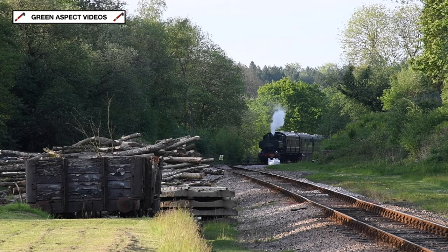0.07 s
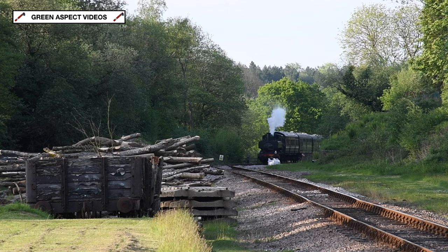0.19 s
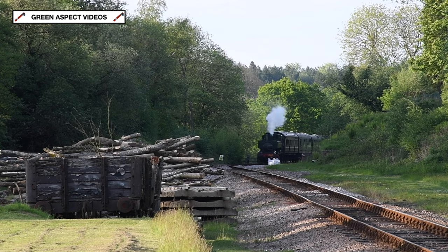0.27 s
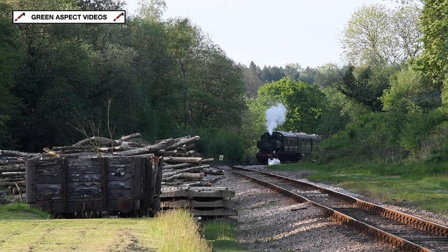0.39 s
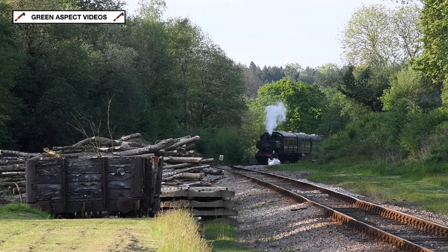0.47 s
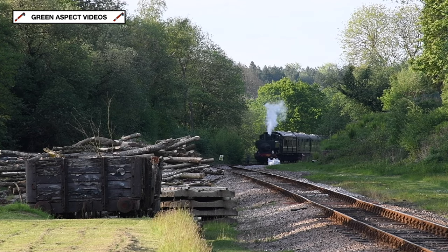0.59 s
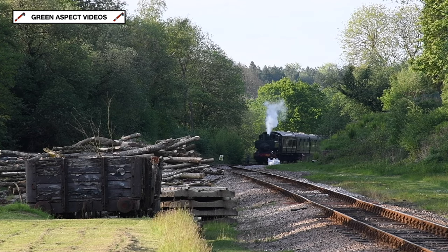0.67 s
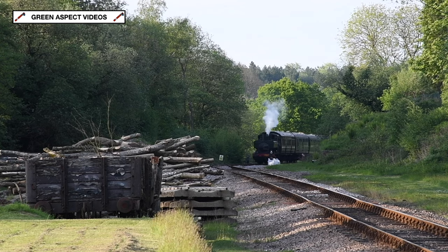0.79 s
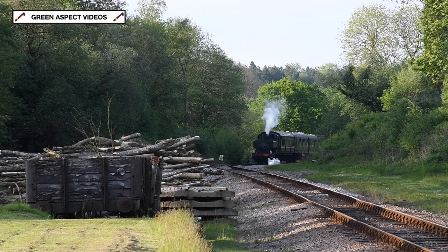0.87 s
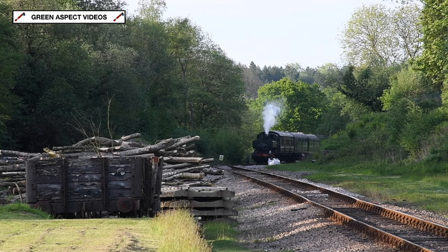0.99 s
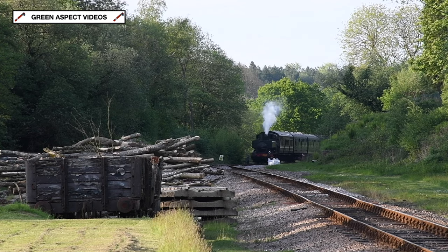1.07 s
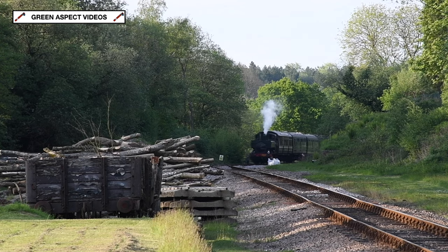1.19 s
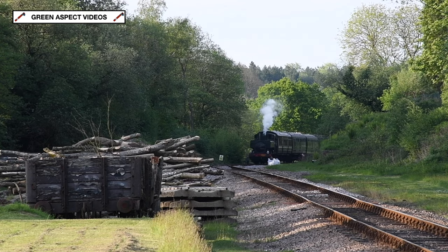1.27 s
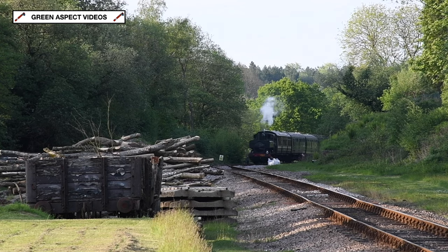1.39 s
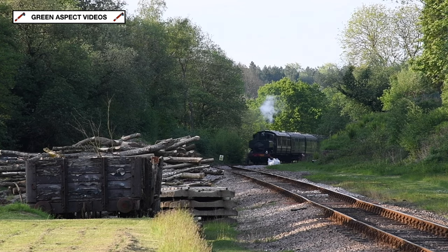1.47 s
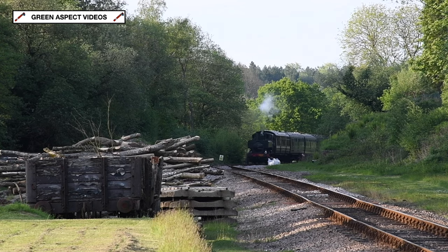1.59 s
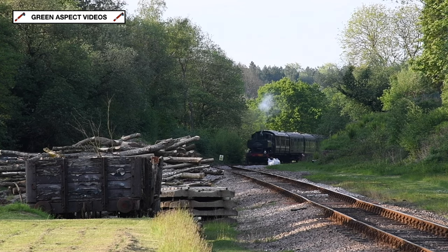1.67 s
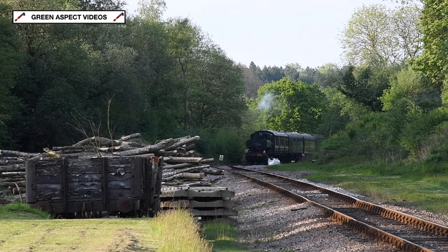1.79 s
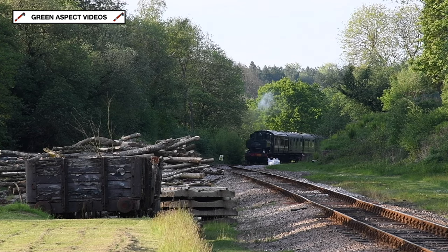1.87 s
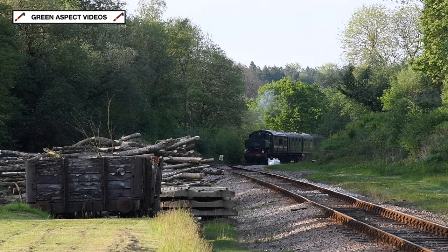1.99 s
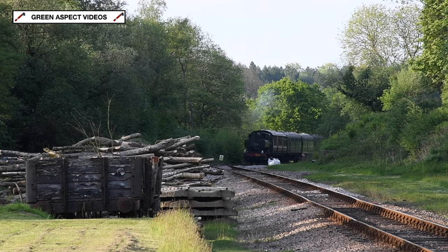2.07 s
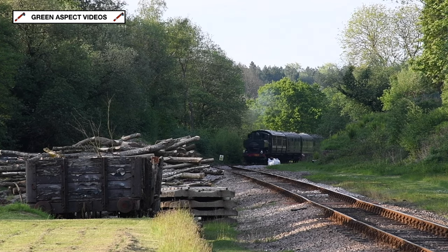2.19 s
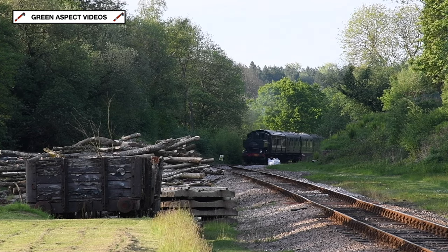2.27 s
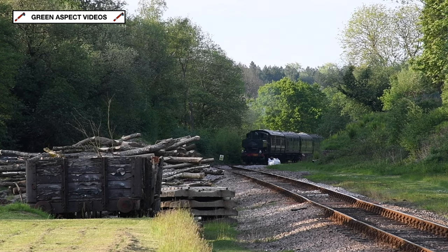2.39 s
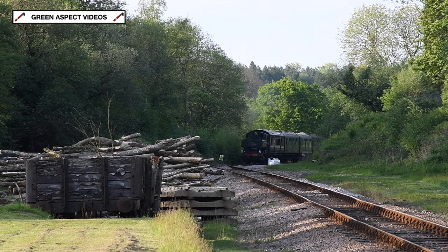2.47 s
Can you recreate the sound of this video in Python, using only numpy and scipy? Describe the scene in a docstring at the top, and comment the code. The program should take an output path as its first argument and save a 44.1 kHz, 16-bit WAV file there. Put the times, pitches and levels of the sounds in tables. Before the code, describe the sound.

Single rough, wavering steam whistle blast far down a wooded railway, then a short echoing tail

```python
"""Distant steam whistle

A steam whistle blows once far down a wooded railway line and its echo hangs in the trees.
The steam jet drives three modes of a stopped bell; they waver and mix into sum and difference tones.
A rough undertone and the jet's roar share the same valve; filtered, decaying noise makes the echo.
Around it: low country rumble as shaped noise, and the even white hiss of the recorder."""
import sys
import numpy as np
from scipy import signal
from scipy.fft import rfft, irfft
from scipy.io import wavfile
from scipy.ndimage import uniform_filter1d

SR = 44100
rng = np.random.default_rng(int(sys.argv[2]) if len(sys.argv) > 2 else 0)


def generate_wav(signal):
    """Clip the signal to [-1, 1] and save it as 16-bit WAV at the path in sys.argv[1]."""
    frames = np.transpose(np.atleast_2d(signal))
    scaled = np.clip(frames, -1, 1) * 32767
    pcm = np.round(scaled).astype(np.int16)
    wavfile.write(sys.argv[1], SR, pcm)


def undo_db(level):
    """Turn decibels back into plain size, where 20 dB means ten times bigger."""
    steps = np.asarray(level, float) / 20
    return 10 ** steps


N = 110250

# spectrum of the country rumble, relative: (frequency [Hz], density [dB per Hz])
COUNTRY_SPECTRUM = [(18, -44), (30, -31.5), (55, -7.5), (80, -2), (140, -7), (200, -16), (300, -12.5),
                    (550, -8), (900, -14.5), (1500, -15.5), (2500, -22), (4500, -41), (8000, -63)]
COUNTRY_DB, HISS_DB = -48.5, -57.5   # rms levels

# echo from the trees: (from [Hz], to [Hz], relative level [dB], time to fall 60 dB [s])
ECHO_BANDS = [(103, 1156, -1, 2), (1310, 2980, -3.5, 1.3), (2872, 4800, -3, .65)]
ECHO_DB, ECHO_RISE_S = -7.5, 0.06

OPEN_S, ATTACK_S, SHUT_S, RELEASE_S = 0.2085, 0.0068, 2.093, 0.035   # the valve

# roar of the steam jet before the valve: (time [s], level [dB])
JET_LEVEL = [(.215, -46.5), (.255, -40), (.33, -35.5), (.43, -39), (.48, -39), (.56, -35), (1.6, -33.5),
             (2.0, -34.5), (2.08, -33.5)]
# spectrum of the roar, relative: (frequency [Hz], density [dB per Hz])
JET_SPECTRUM = [(150, -32), (300, -19.5), (420, -8), (650, -8.5), (1000, 2.5), (1250, -2), (1550, 3.5),
                (1900, -4.5), (2300, -7), (3000, -9.5), (3800, -10), (4700, -16), (5250, -23), (5600, -26),
                (8000, -36.5), (12000, -46.5)]
BLOOM_ABOVE_HZ, BLOOM_S = 950, 0.046   # the roar's treble comes in late

# the bell's lowest mode, before limiting and valve: (time [s], pitch [Hz], level [dB])
FIRST_MODE = [(0.213, 812, -29.5), (.228, 806, -22.5), (0.279, 801, -17), (.34, 818, -20.5),
              (0.414, 836, -16.5), (0.447, 828, -28), (0.502, 830, -32.5), (.525, 838, -15.5),
              (0.548, 842, -13), (0.626, 835, -19.5), (0.701, 853, -11.5), (0.751, 860, -14),
              (0.769, 862, -16), (.85, 865, -18.5), (1.06, 865, -15.5), (1.222, 856, -19),
              (1.268, 855, -16.5), (1.373, 860, -24.5), (1.424, 868, -15.5), (1.508, 858, -19.5),
              (1.702, 866, -18), (1.772, 858, -22.5), (1.832, 872, -15), (1.881, 866, -24.5),
              (1.987, 877, -12.5), (2.046, 872, -21), (2.058, 868, -17), (2.098, 858, -19)]
# its second mode, which briefly takes over as the bell overblows: (time [s], pitch [Hz], level [dB])
SECOND_MODE = [(.215, 2273, -54), (0.231, 2430, -39), (0.272, 2530, -33.5), (.42, 2560, -26),
               (.452, 2495, -21.5), (0.479, 2480, -25), (.486, 2482, -13), (0.496, 2533, -12),
               (0.505, 2425, -21), (0.511, 2481, -13.5), (.535, 2512, -29), (0.578, 2570, -27.5),
               (.64, 2570, -39), (0.788, 2600, -31), (1.039, 2630, -26), (1.128, 2605, -26.5),
               (1.292, 2610, -26), (1.381, 2625, -31), (1.66, 2643, -26.5), (1.898, 2650, -42),
               (1.964, 2661, -30), (2.04, 2635, -37.5), (2.075, 2615, -23.5), (2.11, 2617, -34.5)]
# its third mode: (time [s], pitch [Hz], level [dB])
THIRD_MODE = [(0.23, 3912, -68), (0.286, 3963, -51.5), (0.652, 4186, -40), (0.826, 4243, -42.5),
              (0.848, 4142, -35), (1.162, 4198, -41.5), (2.08, 4224, -39.5)]
# wavering of each mode, lowest first: (filter width [Hz], least steady share [0-1],
# skirt filter width [Hz], skirt level [dB], skirt centre below the mode [Hz], self-limiting [0-1])
MODE_WAVER = [(37.6, 0.33, 82, -8.5, 10, 0.35), (56.6, 0, 205, -5, 70, 0.06), (108, 0.02, 360, -0.5, 20, 0)]
# a mode steadies once well over its usual level: share per dB, threshold
LOCK_PER_DB, LOCK_FROM_DB = 0.2, 4
CLEAN_START_S = 0.12   # time constant of turbulence building in a mode that speaks steadily

# a weak, rough tone under the first mode
UNDERTONE_BELOW_HZ, UNDERTONE_WIDTH_HZ = 100, 50
UNDERTONE_START_DB, UNDERTONE_GROWS_DB_PER_S = -44.5, 7   # level at time zero, then its climb

# mixing tones, dB against the product of the two modes
SECOND_MINUS_FIRST_DB, SECOND_PLUS_FIRST_DB = 4.5, 1.5
THIRD_MINUS_FIRST_DB, THIRD_PLUS_FIRST_DB = 8, -5
TWICE_SECOND_DB = -26   # gain on the second mode's compressed square


def rms_one(x):
    """Scale to rms 1."""
    return x / np.sqrt(np.mean(np.abs(x) ** 2) + 1e-20)


def in_time(rows):
    """Columns of a curve at every sample."""
    s, *columns = np.transpose(rows)
    return [np.interp(np.arange(N) / SR, s, c) for c in columns]


def since_open():
    """Seconds since the valve began to open, zero before."""
    return np.maximum(np.arange(N) / SR - OPEN_S, 0)


def wander(width_hz):
    """Complex noise twice through a one-pole low-pass, run in; rms 1."""
    run_in = 8000
    pole = np.exp(-np.pi * width_hz / SR)
    white = rng.standard_normal(N + run_in) + 1j * rng.standard_normal(N + run_in)
    slow = signal.lfilter([1], [1, -2 * pole, pole * pole], white)
    return rms_one(slow[run_in:])


def coloured(spectrum, patchy_db):
    """Noise with a given spectrum and a slight flutter; rms 1."""
    hz, db = np.transpose(spectrum)
    f = np.maximum(np.arange(N // 2 + 1) * SR / N, 1)
    gain = undo_db(np.interp(np.log(f), np.log(hz), db))
    noise = irfft(rfft(rng.standard_normal(N)) * gain, N)
    flutter = undo_db(patchy_db * wander(36).real)
    return rms_one(noise * flutter)


def recorder_hiss():
    """Even white noise of the recorder, independent in each channel."""
    return undo_db(HISS_DB) * rng.standard_normal((2, N))


def country_rumble():
    """Low, fluttering noise of the open country."""
    return undo_db(COUNTRY_DB) * coloured(COUNTRY_SPECTRUM, patchy_db=3.6)


def woods(x):
    """Dense scatter from the trees: swells, then decays, the treble sooner."""
    t = np.arange(N) / SR
    tail = 0
    for low_hz, high_hz, db, t60 in ECHO_BANDS:
        swell = 1 - np.exp(-t / ECHO_RISE_S)
        decay = 1000. ** (-t / t60)
        scatter = rng.standard_normal(N) * swell * decay
        scatter = scatter / np.sqrt(np.sum(scatter ** 2))   # unit energy
        band = signal.butter(2, [low_hz, high_hz], "band", fs=SR, output="sos")
        tail = tail + undo_db(db) * signal.sosfilt(band, scatter)
    return undo_db(ECHO_DB) * signal.fftconvolve(x, tail)[:N]


def valve():
    """Steam flow: opens fast, holds, dies away."""
    t = np.arange(N) / SR
    opening = np.clip((t - OPEN_S) / ATTACK_S, 0, 1) ** 2
    closing = np.exp(-np.maximum(t - SHUT_S, 0) / RELEASE_S)
    return opening * closing


def jet():
    """The roar of the steam, dull at first, its treble blooming as the flow builds."""
    roar = coloured(JET_SPECTRUM, patchy_db=2.5)
    low_pass = signal.butter(2, BLOOM_ABOVE_HZ, fs=SR, output="sos")
    dull = signal.sosfiltfilt(low_pass, roar)
    bloom = 1 - np.exp(-since_open() / BLOOM_S)
    return undo_db(in_time(JET_LEVEL)[0]) * (dull + bloom * (roar - dull))


def tone(hz, level_db, width_hz, steady, skirt_hz, skirt_db, below_hz, limit):
    """A mode as a complex tone: part steady, part turbulence in a narrow and a wide band."""
    # loud moments lock the tone
    over_db = uniform_filter1d(level_db, size=3000) - np.median(level_db) - LOCK_FROM_DB
    steady = np.clip(steady + LOCK_PER_DB * np.maximum(over_db, 0), 0, 0.985)
    # where the tone is steady enough, it starts clean
    clean = (steady > 0.3) * np.exp(-since_open() / CLEAN_START_S)
    rough = (1 - steady) * (1 - clean)
    steady = 1 - rough

    shift_down = np.exp(-2j * np.pi * below_hz * np.arange(N) / SR)
    skirt = undo_db(skirt_db) * wander(skirt_hz) * shift_down
    shape = np.sqrt(steady) + np.sqrt(1 - steady) * (wander(width_hz) + skirt)
    shape = shape / np.sqrt(steady + (1 - steady) * (1 + undo_db(2 * skirt_db)))
    shape = shape / (np.abs(shape) ** 2 + 0.033) ** (limit / 2)   # self-limiting
    carrier = np.exp(2j * np.pi * np.cumsum(hz) / SR)
    return np.sqrt(2) * undo_db(level_db) * shape * carrier


def undertone():
    """Weak, rough tone that follows the first mode's smoothed pitch from below and grows."""
    level_db = UNDERTONE_START_DB + UNDERTONE_GROWS_DB_PER_S * np.arange(N) / SR
    hz = uniform_filter1d(in_time(FIRST_MODE)[0], size=6000) - UNDERTONE_BELOW_HZ
    return tone(hz, level_db, UNDERTONE_WIDTH_HZ, steady=0, skirt_hz=110, skirt_db=-13.5,
                below_hz=20, limit=0)


def mixing_tones(first, second, third):
    """Products of the modes: sum and difference tones, and the second mode's octave."""
    # a conjugate gives the difference of two pitches
    mixed = undo_db(SECOND_MINUS_FIRST_DB) * second * first.conj()
    mixed = mixed + undo_db(SECOND_PLUS_FIRST_DB) * second * first
    mixed = mixed + undo_db(THIRD_MINUS_FIRST_DB) * third * first.conj()
    mixed = mixed + undo_db(THIRD_PLUS_FIRST_DB) * third * first
    octave = second * second / (np.abs(second) + 1e-9) ** 0.75
    return mixed + undo_db(TWICE_SECOND_DB) * octave


def whistle():
    """Steam through the valve sounds three modes, their mixing tones, the undertone and the roar."""
    modes = (FIRST_MODE, SECOND_MODE, THIRD_MODE)
    first, second, third = (tone(*in_time(rows), *waver) for rows, waver in zip(modes, MODE_WAVER))
    pitched = first + second + third + mixing_tones(first, second, third) + undertone()
    return valve() * (pitched.real + jet())


def scene():
    """All far sound arrives alike at both channels."""
    blast = whistle()
    far = blast + woods(blast) + country_rumble()
    return np.array([far, far])


def top_cut(x):
    """Nothing passes above the cut-off."""
    return signal.sosfilt(signal.butter(12, 15630, fs=SR, output="sos"), x)


def record(dry):
    """The recorder lays its hiss over the scene."""
    mix = dry + recorder_hiss()
    return top_cut(mix)


dry = scene()
out = record(dry)
generate_wav(out)
```